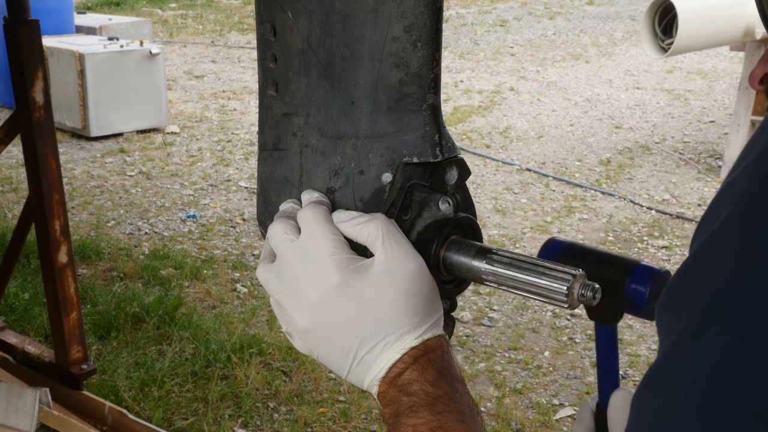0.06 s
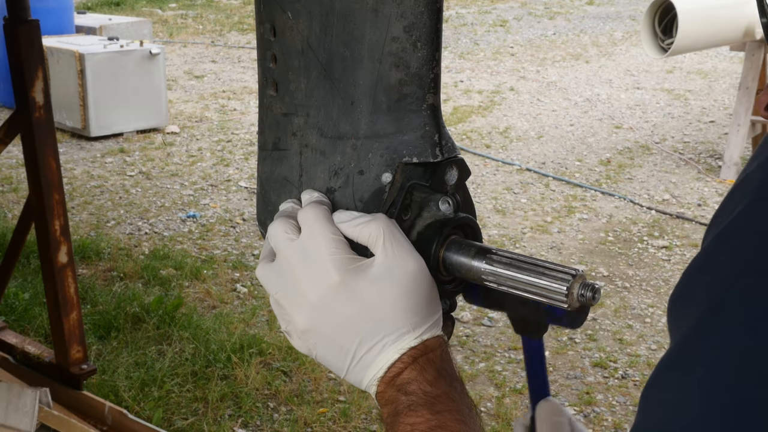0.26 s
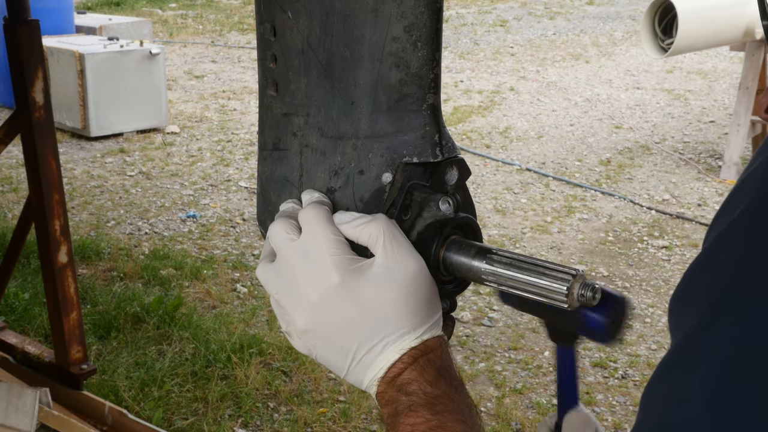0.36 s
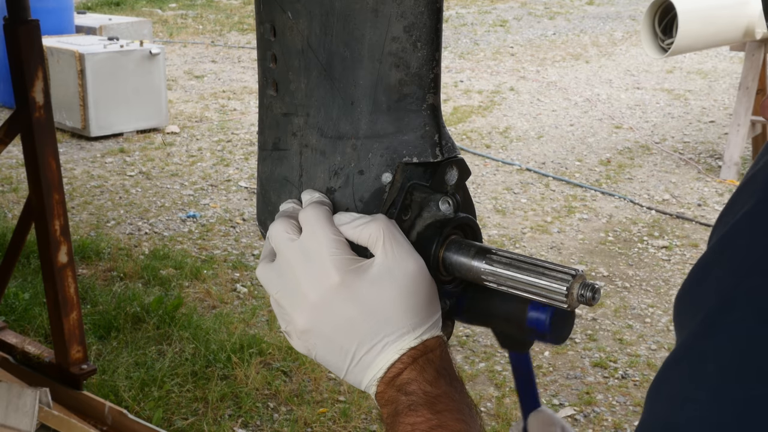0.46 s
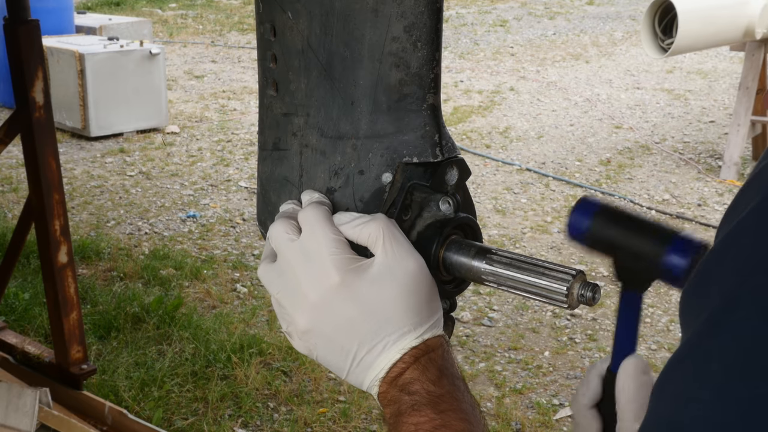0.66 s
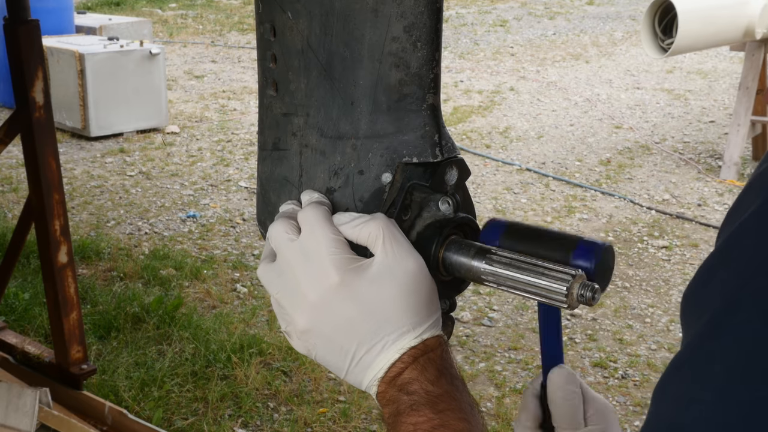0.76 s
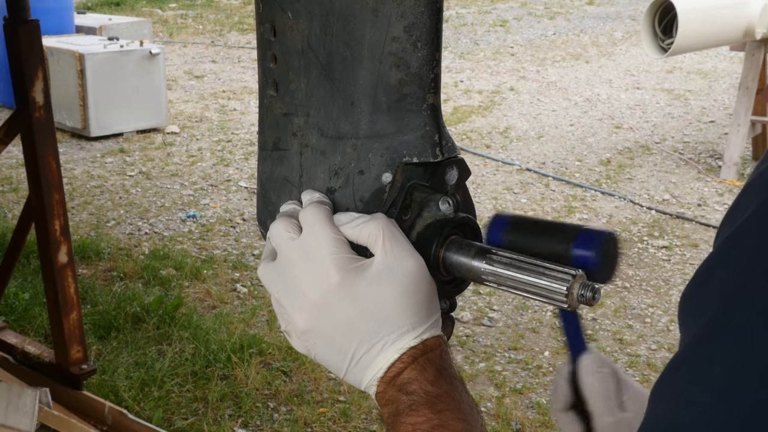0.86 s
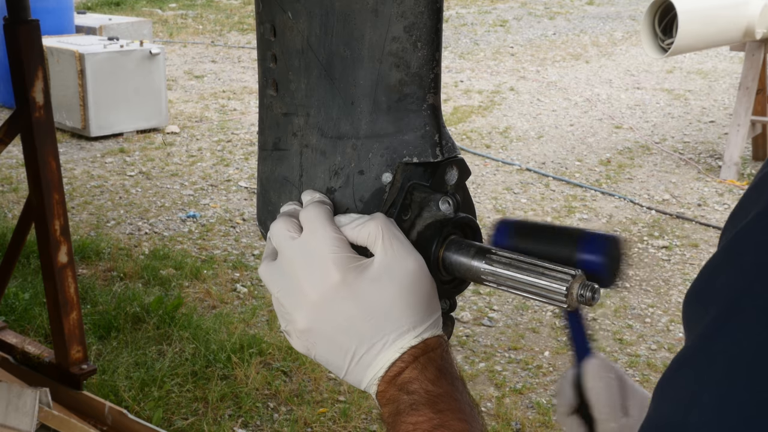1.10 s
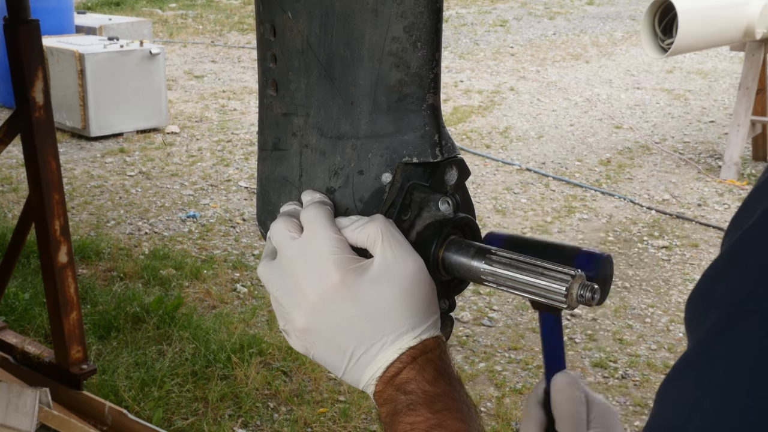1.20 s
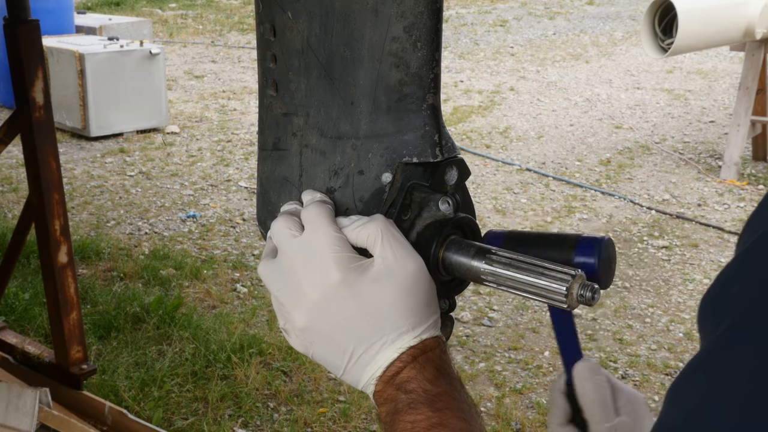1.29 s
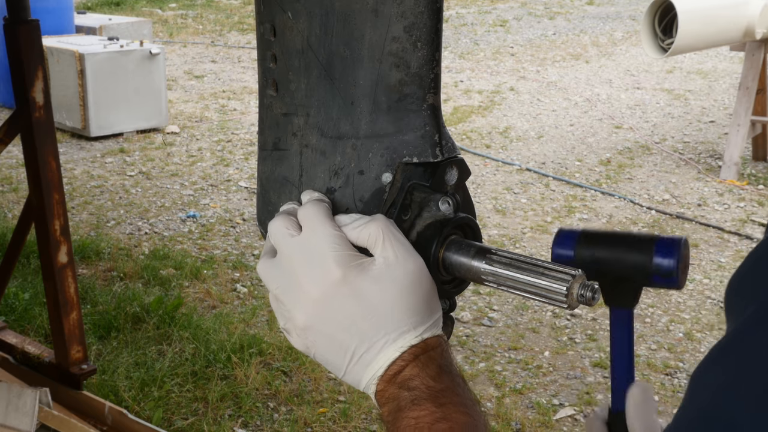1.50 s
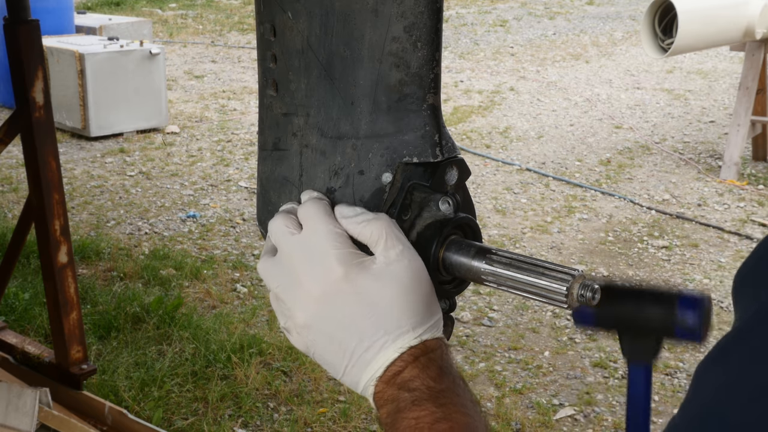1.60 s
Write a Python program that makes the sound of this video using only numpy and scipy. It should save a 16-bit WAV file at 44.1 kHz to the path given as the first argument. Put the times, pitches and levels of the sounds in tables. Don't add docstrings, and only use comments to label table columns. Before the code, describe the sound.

Soft-faced mallet taps a cast metal housing five times, short clicking thuds, outdoors, close up

```python
import sys
import numpy as np
from scipy import signal
from scipy.fft import rfft, irfft, next_fast_len
from scipy.io import wavfile
from scipy.ndimage import uniform_filter1d, map_coordinates

SR = 44100
rng = np.random.default_rng(int(sys.argv[2]) if len(sys.argv) > 2 else 0)


def rack_gain(trim_db):
    fader = np.asarray(trim_db, float)
    return 10 ** (fader / 20)


def bounce(signal):
    frames = np.transpose(np.atleast_2d(signal))
    limited = np.clip(frames, -1, 1)
    pcm = np.round(limited * 32767).astype(np.int16)
    wavfile.write(sys.argv[1], SR, pcm)


N = 72765
T = np.arange(SR // 2) / SR
RISE_S = 0.00013
LATE = T - RISE_S


def unit(x):
    return x / np.sqrt(np.mean(x ** 2) + 1e-20)


def along(points, hz):
    f, v = np.transpose(points)
    return np.interp(np.log(hz + 1), np.log(f + 1), v)


def curves(rows):
    s, *columns = np.transpose(rows)
    return [np.interp(np.arange(N) / SR, s, column) for column in columns]


def wobble(rate):
    knots = rng.standard_normal(int(N / SR * 60) + 8)
    return map_coordinates(knots, [np.arange(N) * min(rate, 60) / SR])


def fade(t60, t=T):
    return rack_gain(-60 * t / t60)


def band(x, hz, width):
    return signal.lfilter(*signal.iirpeak(hz, 1 / np.clip(width, 0.02, 2), SR), x)


def coloured(x, points):
    size = next_fast_len(len(x) + 8192)
    hz = np.fft.rfftfreq(size, 1 / SR)
    return irfft(rfft(x, size) * rack_gain(along(points, hz)), size)[:len(x)]


def rush(spectrum, patchy_db):
    z = signal.stft(rng.standard_normal(N + 512), nperseg=512)[2]
    patches = uniform_filter1d(rng.standard_normal(z.shape), 6, 0)
    patches = uniform_filter1d(patches, 10, 1)
    noise = signal.istft(z * rack_gain(patchy_db * unit(patches)), nperseg=512)[1][:N]
    return unit(coloured(noise, spectrum))


def dying(t60s):
    hz, t, z = signal.stft(rng.standard_normal(SR // 2), SR, nperseg=128)
    decay = rack_gain(-60 * t / along(t60s, hz)[:, None])
    return signal.istft(z * decay, SR, nperseg=128)[1][:SR // 2]


def add(track, s, sound):
    part = track[round(s * SR):][:len(sound)]
    part += sound[:len(part)]


# pitch_hz, level_db, t60_s
FACE_MODES = [(4120, 1.5, 0.0027), (5440, -7, 0.0013), (8730, -4, 0.0038), (11720, -16.5, 0.0045)]


def mallet_contact(click_hz, click_db, fizz_db):
    thud_hz, thud_db, contact_s = 1031, 2, 0.00135
    squash, squash_s = 0.55, 0.0004
    thud = rack_gain(thud_db) * np.cos(2 * np.pi * thud_hz * LATE) * np.exp(-(T / contact_s) ** 3)
    thud = thud * (1 - squash * np.exp(-(T / squash_s) ** 2))

    click = fade(0.004) * np.cos(2 * np.pi * click_hz * LATE)
    for (hz, db, t60), z in zip(FACE_MODES, rng.standard_normal(len(FACE_MODES))):
        click = click + rack_gain(db + 2 * z) * fade(t60) * np.cos(2 * np.pi * hz * (1 + 0.05 * z) * LATE)

    fizz = rack_gain(-23.5 + fizz_db) * fade(0.0056) * band(rng.standard_normal(len(T)), 7000, 1)
    onset = np.sin(np.pi / 2 * np.minimum(T / RISE_S, 1)) ** 2
    return onset * (thud + rack_gain(-4.5 + click_db) * click + fizz)


def mode(hz, db, t60):
    return -rack_gain(db) * fade(t60) * np.sin(2 * np.pi * hz * LATE)


# pitch_hz, level_db, t60_s
CASTING_MODES = [(110.5, -6, 0.23), (148, -4.5, 0.055), (249, -8, 0.096), (335.4, -2.5, 0.099),
                 (427.3, 1.5, 0.07), (492.7, -6, 0.098), (535, 1, 0.04), (589.5, -1, 0.088),
                 (643.4, -10.5, 0.25), (743.4, 9, 0.063), (893, -27, .04), (1056, -12.5, .06),
                 (1170, 0, .035), (1333, -7.5, .05)]


def casting():
    scatter_db = 1.2
    return sum(mode(hz, db + scatter_db * rng.standard_normal(), t60) for hz, db, t60 in CASTING_MODES)


SHAFT_HZ = [1995, 2490, 2700, 3850, 4050, 5480, 6400]
# level_db, t60_s
SHAFT_DECAY = [(-24, 0.16), (-31, .36), (-9, .035), (-37, 0.42), (-23, 0.089), (-29, .06), (-21.5, 0.07)]


def loose_shaft():
    rattle_db, rattle_rate = 3, 55
    return sum(mode(hz, db + rattle_db * wobble(rattle_rate)[:len(T)], t60)
               for hz, (db, t60) in zip(SHAFT_HZ, SHAFT_DECAY))


# pitch_hz, level_db (per Hz)
BUZZ_COLOUR = [(150, -48), (500, -10.5), (900, -8.5), (1900, -17), (3600, -16), (7800, -26), (12500, -47),
               (16500, -71)]
# pitch_hz, t60_s
BUZZ_T60 = [(200, 0.27), (800, 0.093), (2500, 0.065), (6000, 0.044), (14000, .045)]


def buzz():
    noise = coloured(dying(BUZZ_T60), BUZZ_COLOUR)
    return noise / np.sqrt(np.mean(noise[:SR // 100] ** 2))


TAP_S = [.22903, .43404, .75964, .99660, 1.19923]
# level_db, click_hz, click_db, fizz_db, ring_db
TAPS = [
    (-12.5, 2800, 1.5, -9, -3),
    (-13, 3800, -1, -11.5, -3),
    (-14.5, 3050, 0.5, -3, -2.5),
    (-12.5, 3020, 2, 12.5, -3),
    (-19, 3330, 5, 14, 3.5),
]
# level_db, pitch_hz, t60_s
GRAZE = (-38, 850, .009)


def taps():
    blows, rings = np.zeros(N), np.zeros(N)
    ring_rise = 1 - np.exp(-T / 0.00014)
    for s, (db, click_hz, click_db, fizz_db, ring_db) in zip(TAP_S, TAPS):
        add(blows, s, rack_gain(db) * mallet_contact(click_hz, click_db, fizz_db))
        ring = rack_gain(-17) * (casting() + loose_shaft()) + rack_gain(-20) * buzz()
        add(rings, s, rack_gain(db + ring_db) * ring_rise * ring)
    db, hz, t60 = GRAZE
    graze = np.sin(2 * np.pi * hz * T) + 0.15 * rng.standard_normal(len(T))
    add(rings, 0.9933, -rack_gain(db) * fade(t60) * graze)
    return blows, rings


# delay_s, smear_s, centre_hz, width (over centre)
ECHOES = [(.0077, .001, 900, 2), (.0205, .003, 2500, 1.5), (.0865, .005, 1400, .7), (.0875, .007, 3700, .4),
          (.088, .02, 170, .3), (.132, .008, 2300, .6), (.142, .007, 1700, .9), (.14, .025, 112, .2),
          (.172, .008, 3900, .15)]
ECHO_DB = [-37, -37.5, -48.5, -50.5, -25.5, -48.5, -43.5, -33, -55]
# pitch_hz, t60_s
YARD_T60 = [(150, 1), (600, 0.22), (2000, 0.83), (5000, 0.28), (12000, 0.078)]
# pitch_hz, level_db
YARD_COLOUR = [(100, -5.5), (200, 5), (650, 18.5), (1100, -11.5), (2500, 3), (3200, -16.5), (3900, -5.5),
               (9000, -9)]


def yard(x):
    response, t = np.zeros(SR // 2), np.arange(SR // 10) / SR
    for db, (delay, smear, hz, width) in zip(ECHO_DB, ECHOES):
        burst = rng.standard_normal(len(t)) * t * np.exp(-2 * t / smear)
        burst = band(band(burst, hz, width), hz, width)
        add(response, delay - smear / 2, rack_gain(db) * burst / np.linalg.norm(burst))
    tail = coloured(dying(YARD_T60), YARD_COLOUR)
    add(response, 0.018, rack_gain(-26.5) * tail / np.linalg.norm(tail))
    return signal.fftconvolve(x, response)[:N]


TICK_S = [.1925, 1.3775, 1.4545, 1.4925, 1.5878, 1.606, 1.6058, 1.6062, 1.6168, 1.164]
# level_db, pitch_hz, width (over pitch)
TICKS = [(-70, 8400, 0.2), (-68.5, 8400, 0.14), (-64, 4500, 0.201), (-65, 5500, 0.11), (-54, 1700, 1),
         (-59, 7900, 0.32), (-59.5, 5200, 0.11), (-53, 22000, 0.68), (-66, 3400, 0.45), (-73.5, 5000, 0.1)]


def ticks():
    out, t = np.zeros(N), np.arange(SR // 30) / SR
    for s, (db, hz, width) in zip(TICK_S, TICKS):
        snap = rng.standard_normal(len(t)) * np.exp(-t / 0.0008)
        snap = band(band(snap, hz, width), hz, width)
        add(out, s, rack_gain(db) * snap / np.abs(snap).max())
    return out


# pitch_hz, level_db (per Hz)
CLOTH = [(1200, -1.5), (2500, -9), (4500, 4), (6000, -2.5), (9000, -13.5), (15000, -34)]
# start_s, level_db
SLEEVE = [(0, -96), (1.2, -111.5), (1.33, -78.5), (1.45, -74), (1.65, -77.5)]


def sleeve():
    return rack_gain(curves(SLEEVE)[0] + 1.39 * wobble(21)) * rush(CLOTH, patchy_db=2.0)


# start_s, pitch_hz, level_db
ENGINE = [(0, 59.8, -56.5), (.2, 64.8, -52.5), (.5, 63, -55), (.7, 65.8, -64.5), (.95, 67.33, -57),
          (1.2, 67.6, -54.5), (1.5, 68, -50), (1.65, 71, -56)]


def engine():
    hz, db = curves(ENGINE)
    turn = 2 * np.pi * np.cumsum(hz) / SR
    level = np.sqrt(2) * rack_gain(db + 0.5 * wobble(10))
    second = rack_gain(-23 + 3.7 * wobble(4.6)) * np.sin(2 * turn)
    return level * (np.sin(turn) + second)


# pitch_hz, level_db (per Hz)
WASH = [(20, -9), (45, -10), (130, -8), (250, -18), (950, -23.5), (1700, -31.5), (5000, -50.5),
        (15000, -51)]
# start_s, level_db
WASH_LEVEL = [(0, -63), (.2, -65), (.7, -63.5), (1.2, -63.5), (1.65, -61)]


def traffic():
    return rack_gain(curves(WASH_LEVEL)[0] + 0.8 * wobble(8)) * rush(WASH, patchy_db=1.1)


# pitch_hz, level_db (per Hz)
HISS = [(500, 5), (1500, -6), (6000, -1), (14500, -13.5), (16000, -22)]


def hiss():
    return rack_gain(-88.5) * rush(HISS, patchy_db=-4.5)


def scene():
    blows, rings = taps()
    direct = blows + rings
    reflected = yard(blows + 0.26 * rings)
    return (direct + reflected + ticks() + engine() + traffic() + sleeve())[None]


def roll_off(x):
    return signal.sosfilt(signal.butter(12, 16830, fs=SR, output="sos"), x)


def record(dry):
    x = dry + hiss()
    x = signal.sosfilt(signal.butter(2, 79, 'high', fs=SR, output='sos'), x)
    x = signal.sosfilt(signal.butter(4, 14500, fs=SR, output='sos'), x)
    clip_top, hardness = 0.28, 10
    x = x / (1 + np.abs(x / clip_top) ** hardness) ** (1 / hardness)
    x = signal.sosfilt(signal.butter(8, 15600, fs=SR, output='sos'), x)
    return roll_off(x)


dry = scene()
out = record(dry)
bounce(out)
```